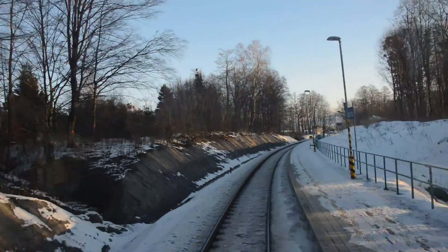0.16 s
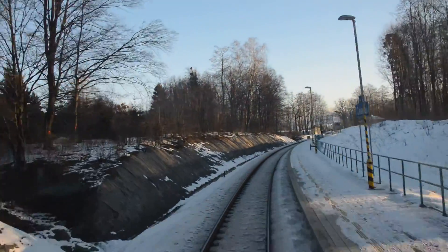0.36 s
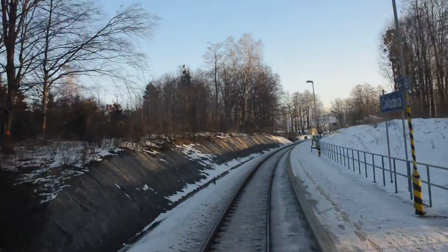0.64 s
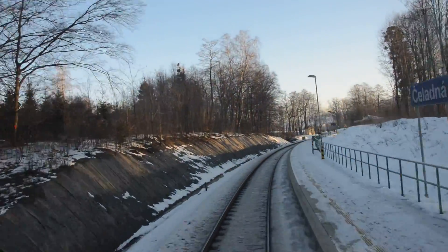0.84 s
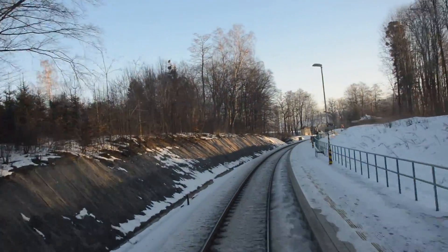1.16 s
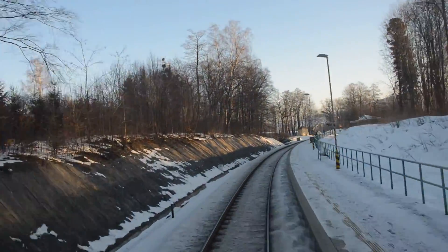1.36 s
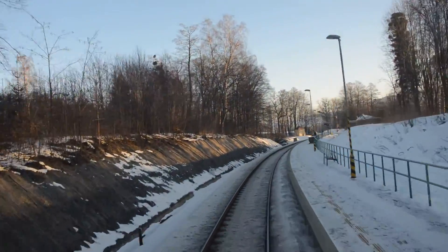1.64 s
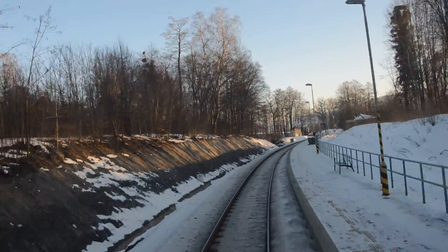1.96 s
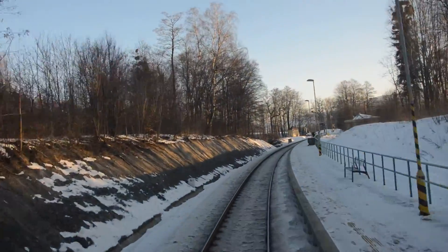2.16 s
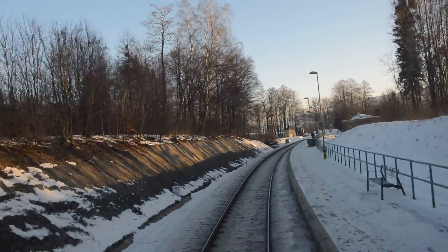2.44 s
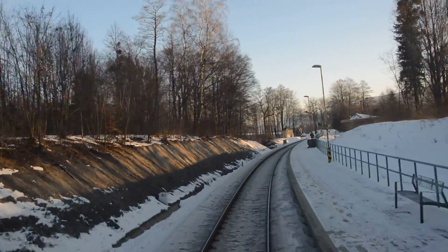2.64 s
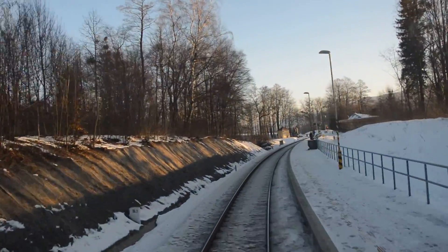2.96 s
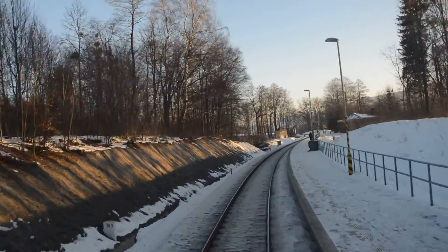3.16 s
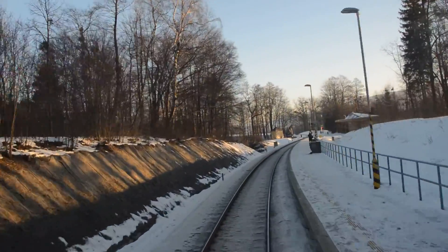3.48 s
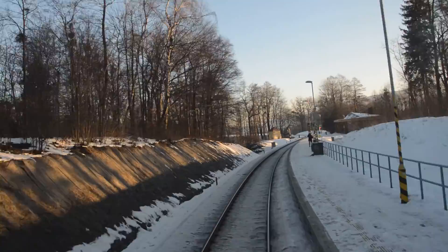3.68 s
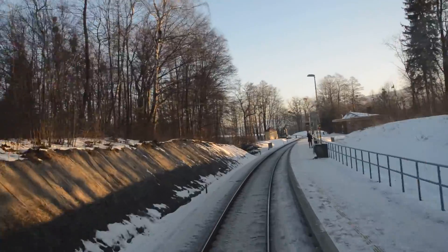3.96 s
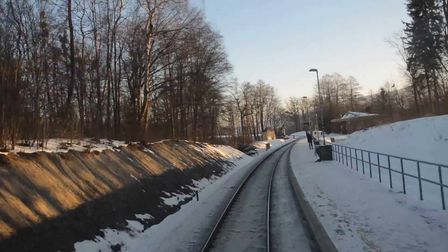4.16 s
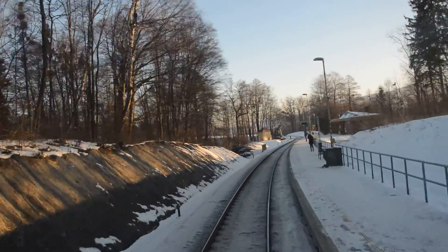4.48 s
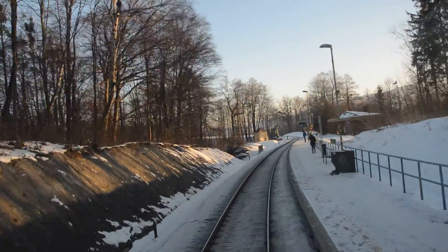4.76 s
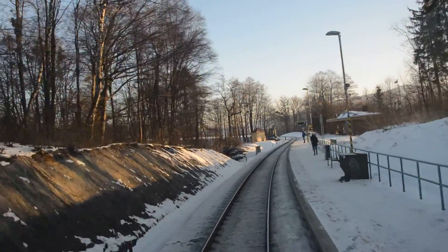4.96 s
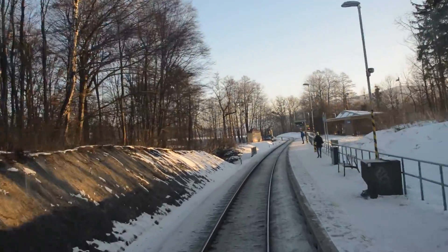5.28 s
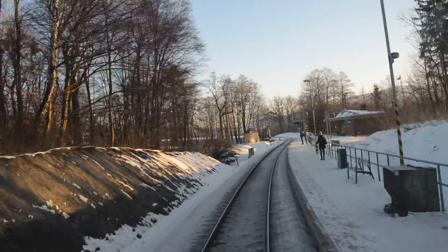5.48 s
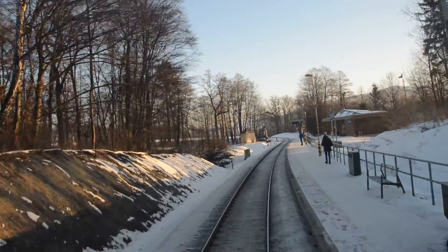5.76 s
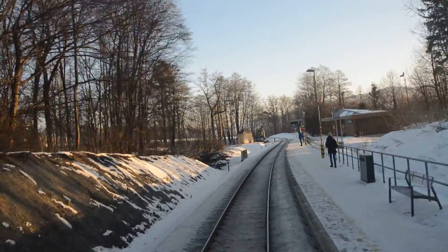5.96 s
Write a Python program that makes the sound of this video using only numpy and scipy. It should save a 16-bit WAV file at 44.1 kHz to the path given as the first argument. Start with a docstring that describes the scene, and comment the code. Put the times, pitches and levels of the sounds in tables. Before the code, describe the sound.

A close cab microphone catches a railcar braking into a station. Low motor tones sink and swell through the enclosed body, over soft wheel rumble and engine thuds. Tiny metallic rattles, brake-lever clacks and faint piercing brake squeals appear, then a weak fluttering whine. The drone continues mostly alone until a sudden bright air-valve hiss with a bassy kick, dulling and draining within a second.

```python
"""The drone inside a braking diesel railcar: wheel and drive tones sink with the speed through cab resonances,
over filtered-noise rolling and the thuds of an idling engine. Brakes squeal as wavering sines and a disc whines.
Compressed air rushes from a valve as coloured noise, with a low thump; a lever clacks and a loose fitting
ticks as shaped noise bursts. A gain control ducks the whole mix when it gets loud, then recovers steadily."""
import sys
import numpy as np
from scipy import signal
from scipy.fft import rfft, irfft, next_fast_len
from scipy.io import wavfile
from scipy.ndimage import uniform_filter1d, map_coordinates

SR = 44100
rng = np.random.default_rng(int(sys.argv[2]) if len(sys.argv) > 2 else 0)


def generate_wav(signal):
    """Clip the signal to [-1, 1] and save it as 16-bit WAV at the path in sys.argv[1]."""
    frames = np.transpose(np.atleast_2d(signal))
    scaled = np.clip(frames, -1, 1) * 32767
    pcm = np.round(scaled).astype(np.int16)
    wavfile.write(sys.argv[1], SR, pcm)


N = 269936

HUM_HZ, SAG_HZ_PER_S = 75.18, 3.37  # drive hum at the start, and its fall under steady braking


def amp(db):
    """Gain of a level in dB."""
    return 10 ** (np.asarray(db) / 20)


def unit(x):
    """x at rms 1."""
    return x / np.sqrt(np.mean(x ** 2) + 1e-20)


def clock():
    """The time of each sample, in seconds."""
    return np.arange(N) / SR


def wobble(rate_hz):
    """A smooth random curve through rate_hz normal random knots a second."""
    knots = rng.standard_normal(int(N * rate_hz / SR) + 4)
    return map_coordinates(knots, [np.arange(N) * rate_hz / SR])


def filtered(x, response):
    """x with its spectrum multiplied by a response of frequency."""
    m = next_fast_len(N + SR // 2)
    return irfft(rfft(x, m) * response(np.fft.rfftfreq(m, 1 / SR)), m)[:N]


def colour(points):
    """The response through (pitch_hz, level_db) points on a log frequency axis."""
    f, db = np.transpose(points)
    return lambda hz: amp(np.interp(np.log(hz + 1), np.log(f), db))


def peaks(modes, hz):
    """Power response of (centre_hz, width_hz, level_db) resonances with steep skirts."""
    return sum(amp(db) ** 2 / (1 + ((hz - centre) / width) ** 2 * 2) ** 2 for centre, width, db in modes)


def noise(points):
    """Fresh coloured noise of rms 1."""
    return unit(filtered(rng.standard_normal(N), colour(points)))


def phase(hz):
    """Running angle of a changing frequency, in radians."""
    return 2 * np.pi * np.cumsum(hz) / SR


def strike(start_s, attack_s, t60_s):
    """Envelope of a contact: an exponential rise under a decay of 60 dB per t60_s."""
    t = np.maximum(clock() - start_s, 0)
    return (1 - np.exp(-t / attack_s)) * amp(-60 * t / t60_s)


def envelope(start_s, rise_s, hold_s, fall_s):
    """Straight rise to 1, hold and straight fall to 0."""
    t = clock() - start_s
    return np.clip(np.minimum(t / rise_s, 1 - (t - rise_s - hold_s) / fall_s), 0, 1)


def hum_hz():
    """Pitch of the drive hum, in step with the road speed."""
    return HUM_HZ - SAG_HZ_PER_S * clock()


def drone(drive_db=-1, split_hz=800):
    """Drive tones, rolling and engine share one cab body; rolling and engine ease off with the speed."""
    # resonances of the cab: centre_hz, width_hz, level_db
    cab_modes = [(20, 7.8, 2), (68, 21, -4), (94.4, 16, -4.5), (137, 14, 0), (211.9, 13, -0.5),
                 (209.2, 22.5, 0.5), (241, 56, -1.5), (266.6, 30, -4), (296.3, 19.2, 0.5), (372, 14, -12),
                 (397, 22, -7), (434, 22.2, -4.5), (492, 28, -11.5), (507, 16.3, -7.5), (550, 19.2, -6.5),
                 (1315, 28, -27), (2870, 36, -33), (5470, 200, -46), (9140, 350, -51.5)]
    # broad sound through floor and windows: pitch_hz, level_db (per Hz)
    shell_points = [(15, -13), (32, -19), (46, -4), (110, -6.5), (175, -11.5), (320, -7), (460, -18.5),
                    (620, -14), (820, -26), (1500, -33.5), (3000, -41.5), (6000, -49.5), (10000, -53),
                    (12000, -58), (16000, -62)]
    # brief swells of the rail hiss: loudest_s, half_length_s, level_db
    hiss_swells = [(2.09, 0.39, 2.5), (3.48, 0.033, 2)]

    grid = np.geomspace(5, SR / 2, num=4000)
    gain = np.sqrt(peaks(cab_modes, grid) + colour(shell_points)(grid) ** 2)
    body = lambda hz: np.interp(hz, grid, gain)
    low = lambda hz: 1 / (1 + (hz / split_hz) ** 8)  # power share of the roar; the hiss has the rest

    roar = unit(filtered(rng.standard_normal(N), lambda hz: body(hz) * np.sqrt(low(hz))))
    hiss = unit(filtered(rng.standard_normal(N), lambda hz: body(hz) * np.sqrt(1 - low(hz))))
    engine = amp(-8.5) * unit(filtered(diesel(), body))

    # the powers set how strongly each amplitude follows the speed
    speed = hum_hz() / HUM_HZ  # 1 at the start
    rumble_db, rumble_power = -22, 1
    hiss_db, hiss_power = -38.5, 2.07
    rumble = amp(rumble_db) * speed ** rumble_power * (roar * amp(0.57 * wobble(8)) + engine)
    swell_db = sum(db * np.exp2(-((clock() - s) / half) ** 2) for s, half, db in hiss_swells)
    rails = amp(hiss_db + swell_db + 0.6 * wobble(14)) * speed ** hiss_power * hiss
    return rumble + rails + amp(drive_db) * drive(body)


def drive(body, waver_db=2, growth_db_per_s=0.82):
    """Wheel and drive tones sink with the speed, each swelling as it crosses a cab resonance."""
    # tones before the cab shapes them: multiple (of the drive hum), level_db (relative)
    tone_rows = [(1, -32.5), (1.835, -35), (2.015, -38), (2.42, -37), (2.97, -31.5), (3.19, -31),
                 (3.66, -32), (4.08, -33), (4.245, -31.5), (5.41, -32.5), (6.07, -37)]
    hz = hum_hz()
    angle = phase(hz * (1 + 0.0019 * wobble(5.95)))
    tones = 0
    for multiple, db in tone_rows:
        level = amp(db + waver_db * wobble(3.04)) * body(multiple * hz)
        tones = tones + level * np.sin(multiple * angle + rng.uniform(0, 2 * np.pi))
    return amp(growth_db_per_s * clock()) * tones  # the tones grow as the braking goes on


def diesel(firing_hz=30.52):
    """One thud per firing of the idling engine, uneven in size."""
    turns = phase(firing_hz * (1 + .009 * wobble(4))) / (2 * np.pi)
    firings = np.diff(np.floor(turns), prepend=0) * (1 + .5 * rng.standard_normal(N))
    t = clock()[:SR // 3]
    frame = rng.standard_normal(len(t)) * amp(-60 * t / 0.43)  # the underframe smears each thud
    thuds = signal.fftconvolve(firings, frame)[:N]
    engine_colour = [(10, -33), (60, -14), (92, 4), (200, -5), (380, -9), (430, 0), (550, -11.0),
                     (620, -11.5), (1500, -27), (4000, -47)]  # pitch_hz, level_db
    return unit(filtered(thuds, colour(engine_colour)))


def air(whistle_hz=10800, whistle_width_hz=800):
    """The valve snaps open; as the pressure drains, the jet dulls and ends in a thin whistle."""
    # sharp jet: pitch_hz, level_db (per Hz)
    jet_colour = [(300, -5), (700, -11), (1050, -21), (1300, -5), (2100, -14.5), (2800, -3.5),
                  (3500, -17.5), (4200, -18), (6800, 1), (7900, -3), (9000, 4.5), (10200, 4.5), (12000, -4),
                  (15500, -15), (17000, -40)]
    # duller rush in the pipe: pitch_hz, level_db (per Hz)
    pipe_colour = [(400, -27), (900, -8), (1250, -7), (2500, -2), (3500, -3.5), (4400, 2), (5500, 4.5),
                   (7700, -3.5), (10500, -0.5), (15600, -38)]
    # pipe resonances: centre_hz, width_hz, level_db
    pipe_modes = [(1286, 35, 10), (1600, 70, -4), (1740, 37, 5.5), (3060, 43, 2.5)]

    t = clock()[:SR // 4]
    walls = rng.standard_normal(len(t)) * amp(-60 * t / .3)
    walls = .5 * walls / np.linalg.norm(walls) + (t == 0)  # the cab walls comb the hiss finely

    def ring(x):
        """Reflections from the walls, then the pipe resonances on top."""
        reflected = signal.fftconvolve(x, walls)[:N]
        return unit(filtered(reflected, lambda hz: np.sqrt(1 + peaks(pipe_modes, hz))))

    whistle_mode = [(whistle_hz, whistle_width_hz, 0)]
    whistle = unit(filtered(rng.standard_normal(N), lambda hz: np.sqrt(peaks(whistle_mode, hz))))

    # the higher the power of flow, the sooner a layer fades
    flow = air_flow()
    jet = amp(-7.5) * flow ** 5 * ring(noise(jet_colour))
    pipe = amp(-13.5) * flow ** 2.63 * ring(noise(pipe_colour))
    nozzle = amp(-33) * flow ** 1.57 * whistle
    return (jet + pipe + nozzle) * amp(0.26 * wobble(70))


def air_flow(open_s=5.112, attack_s=0.015, hold_s=0.11, drain_s=0.71):
    """Flow through the brake valve, 0 to 1: it snaps open, holds and falls steadily as the line empties."""
    t = np.maximum(clock() - open_s, 0)
    return (1 - np.exp(-t / attack_s)) * np.clip(1 - (t - hold_s) / drain_s, 0, 1)


def thump(start_s=5.135, t60_s=0.71):
    """The opening valve kicks its pipe and the desk into a low noise burst."""
    kick = amp(-17) * strike(start_s, .008, t60_s)
    # pitch_hz, level_db
    return kick * noise([(70, -30), (130, -5), (170, 1), (230, 4), (450, -26), (900, -57.0), (2000, -72)])


def brakes(judder_hz=1601, judder_db=-1, rise_s=.015, fall_s=0.029):
    """The brakes sing in thin wavering tones, after a short rough screech and a falling chirp."""
    # squeals: start_s, end_s, pitch_hz, level_db (relative)
    squeal_rows = [(.25, 0.503, 6280, -50.5), (0.254, 0.501, 12630, -60), (1.68, 2.19, 12590, -66),
                   (1.988, 2.07, 12570, -57), (2.295, 2.39, 12570, -63), (2.45, 2.628, 12560, -56),
                   (2.655, 2.79, 12560, -56)]
    # rough screech: multiple (of judder_hz), level_db (relative)
    screech_rows = [(1, -45), (2, -50), (3, -49), (4, -48), (5, -49), (6, -43.5), (7, -52), (8, -61),
                    (9, -65)]
    # slide into the first squeal: start_s, end_s, start_hz, end_hz, level_db (relative)
    chirp_row = (.158, .24, 13850, 8000, -49.5)

    t = clock()
    waver_hz = 28 * wobble(240)

    def sing(start, end, hz, db):
        """A squeal catches quickly and lets go more slowly."""
        gate = np.clip(np.minimum((t - start) / rise_s, (end - t) / fall_s), 0, 1)
        return amp(db) * gate * np.sin(phase(hz + waver_hz))

    start, end, from_hz, to_hz, chirp_db = chirp_row
    chirp = sing(start, end, np.interp(t, [start, end], [from_hz, to_hz]), chirp_db)
    squeal = chirp + sum(sing(*row) for row in squeal_rows)

    angle = phase(judder_hz * (1 + .008 * wobble(500)))
    # each overtone breaks up on its own
    screech = sum(amp(db) * flutter() * np.sin(k * angle) for k, db in screech_rows)
    fade = np.clip((.135 - t) / .06, 0, 1)
    return flutter() * (squeal + amp(judder_db) * fade * screech)


def flutter():
    """The quick beading of a squeal as the pad grips and slips, as a random gain of rms 1."""
    return unit(amp(2.8 * wobble(130) + 1.2 * wobble(25)))


def disc(disc_hz=4584, octave_db=-17, pulsing_db=0.5):
    """The pad rubs a disc mode into a fluttering, pulsing whine with a weak octave."""
    # whines: start_s, rise_s, hold_s, fall_s, level_db
    whine_rows = [(2.05, .8, 0.57, 1.6, -55), (5.7, .4, .2, .3, -49.5)]
    angle = phase(disc_hz + 8 * wobble(20) + 30 * wobble(260))
    tone = unit(np.sin(angle) + amp(octave_db) * np.sin(2 * angle))
    rub = sum(amp(db) * envelope(start, rise, hold, fall) for start, rise, hold, fall, db in whine_rows)
    return rub * unit(amp(pulsing_db * wobble(28))) * flutter() * tone


def lever(snap_db=4, snap_t60_s=0.012, detent_s=0.0054):
    """Dull brake-lever clacks snap into a notch, with a short desk ring and varying bright scraping."""
    # clacks: start_s, level_db (relative), t60_s, scrape_db (relative to the knock)
    clack_rows = [(0.044, -35, 0.21, -6), (.543, -56, 0.22, 7), (1.995, -42.5, 0.35, -3.5),
                  (2.565, -28.5, 0.17, -27), (2.622, -47, 0.23, -1), (2.797, -28.5, 0.17, -14.5),
                  (3.517, -52.5, .3, 3.5)]
    # dull knock: pitch_hz, level_db (per Hz)
    knock_colour = [(470, -36), (800, -7), (1220, -2.5), (1400, -2.5), (2780, -11), (4080, -32),
                    (5480, -19), (6310, -30), (9000, -41), (11700, -61), (19800, -120)]
    # bright scrape: pitch_hz, level_db
    scrape_colour = [(2000, -3), (3500, 5.5), (6000, 0.5), (10000, -1.5), (15000, -21)]

    knock, scrape = noise(knock_colour), noise(scrape_colour)
    clacks = 0
    for start, db, t60, scrape_db in clack_rows:
        contact = strike(start, .0015, t60) + .2 * strike(start, .01, 2 * t60)
        # the snap into the notch comes detent_s after first contact
        snap = amp(snap_db) * strike(start + detent_s, 0.00061, snap_t60_s)
        clacks = clacks + amp(db) * (contact * (knock + amp(scrape_db) * scrape) + snap * knock)
    return clacks


def fitting(tick_db=-2, echo_db=-7.5, period_s=.0512):
    """A loose fitting rattles at its own pace: sharp little ticks, each with a brief answer from the cab."""
    # bouts of rattling: start_s, count (ticks), first_db, last_db (relative)
    rattle_rows = [(.218, 3, -35, -31.5), (0.5583, 1, -32.5, -31), (1.583, 4, -42.5, -31),
                   (1.797, 2, -33.5, -33), (1.886, 3, -33.5, -31.5), (2.1106, 1, -34, -33),
                   (2.255, 2, -41, -44), (2.449, 6, -34.5, -34)]
    # tick colour: pitch_hz, level_db
    tick_points = [(1500, -8), (3400, -1), (3900, 5.5), (4400, -4.5), (6800, -7.5), (7900, 1), (10000, 1.5),
                   (11000, -20), (13000, -21), (15000, -23)]
    blows = 0
    for start, count, first_db, last_db in rattle_rows:
        for k, db in enumerate(np.linspace(first_db, last_db, round(count))):
            s = start + k * period_s
            blows = blows + amp(db) * (strike(s, .0002, .012) + amp(echo_db) * strike(s, .003, .11))
    return amp(tick_db) * blows * noise(tick_points)


def scene():
    """Everything heard at the driver's desk."""
    return (drone() + air() + thump() + brakes() + disc() + lever() + fitting())[None]


def record(dry, threshold_db=-14.0, attack_s=0.043, release_db_per_s=28, top_hz=15780):
    """Gain control ducks after a moment and recovers steadily; peaks round off; then the band limit."""
    power = np.abs(uniform_filter1d(dry[0] ** 2, size=2048))
    over_db = np.maximum(10 * np.log10(power + 1e-12) - threshold_db, 0)
    recovery = release_db_per_s * clock()
    wanted_db = np.maximum.accumulate(over_db + recovery) - recovery  # jumps up, falls at the release rate
    lag = np.exp(-1 / (attack_s * SR))
    duck_db = signal.lfilter([1 - lag], [1, -lag], wanted_db)
    held = dry[0] * amp(-duck_db)
    rounded = held / (1 + np.abs(held / .92) ** 8) ** (1 / 8)
    return filtered(rounded, lambda hz: hz < top_hz)[None]


dry = scene()
out = record(dry)
generate_wav(out)
```